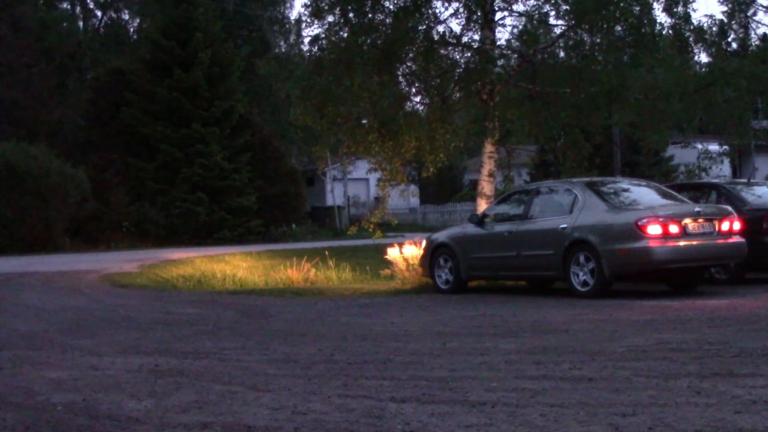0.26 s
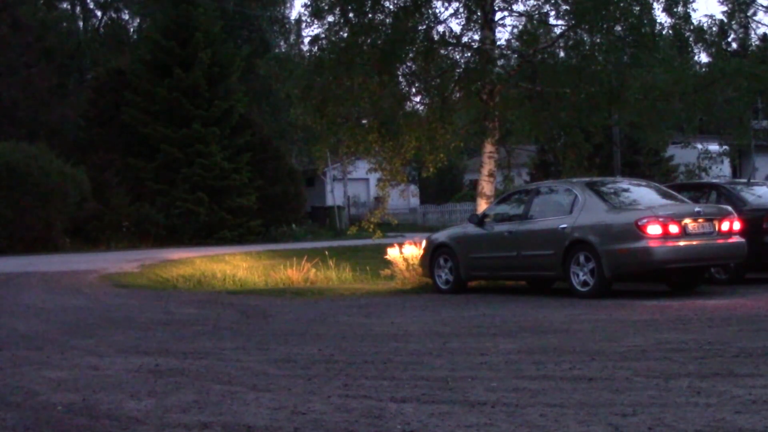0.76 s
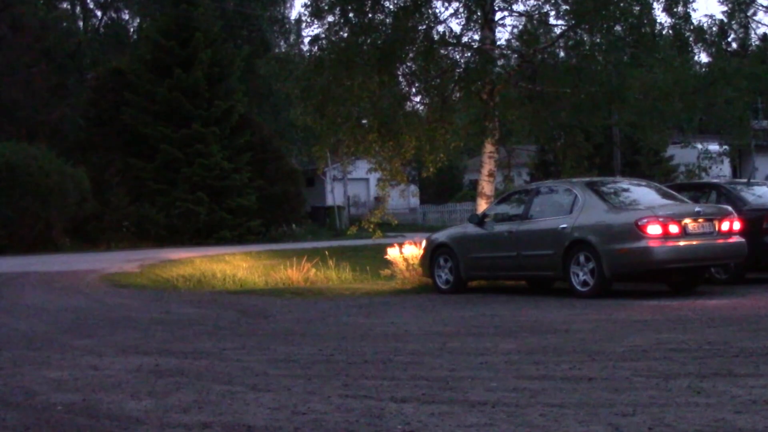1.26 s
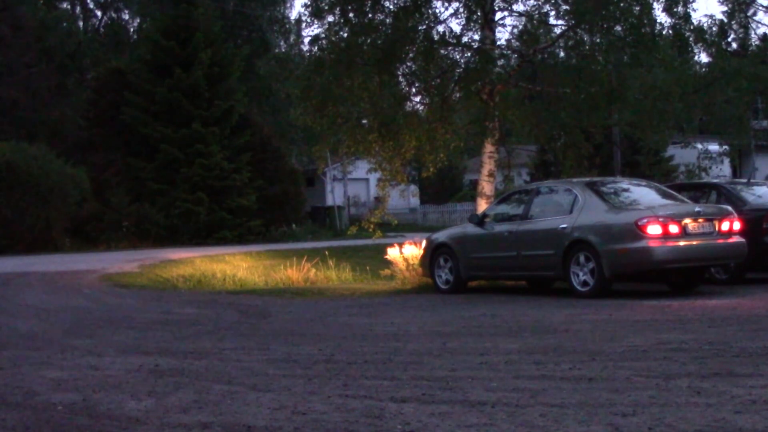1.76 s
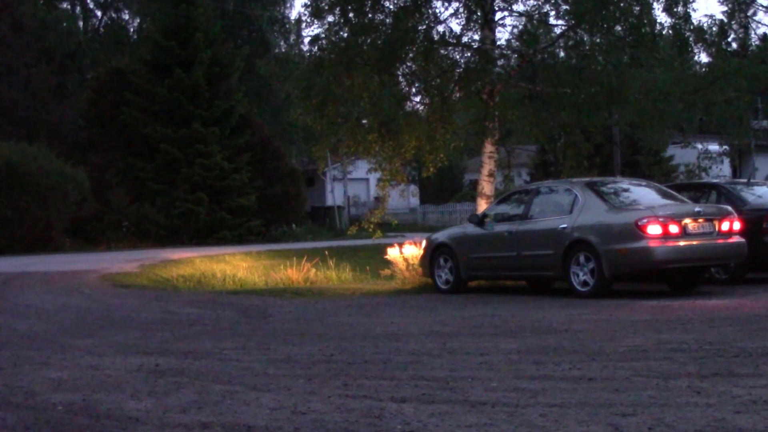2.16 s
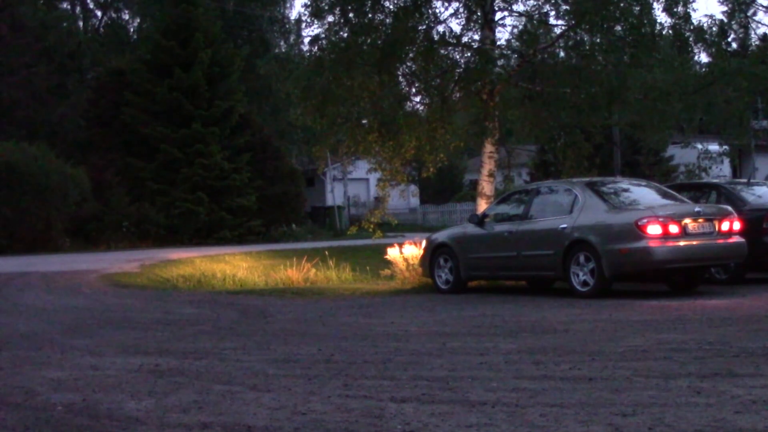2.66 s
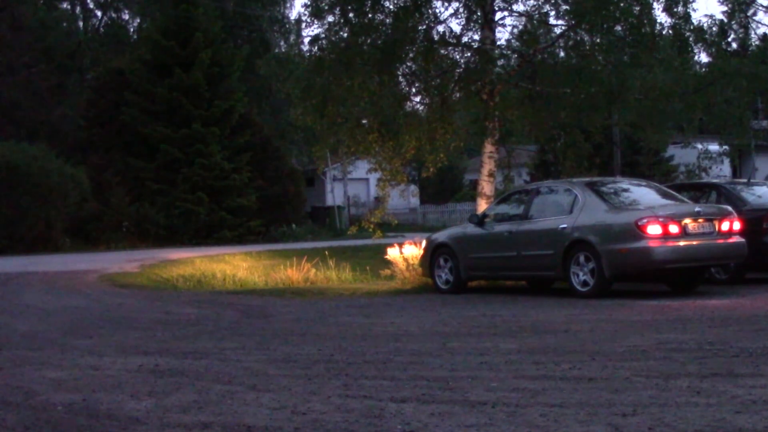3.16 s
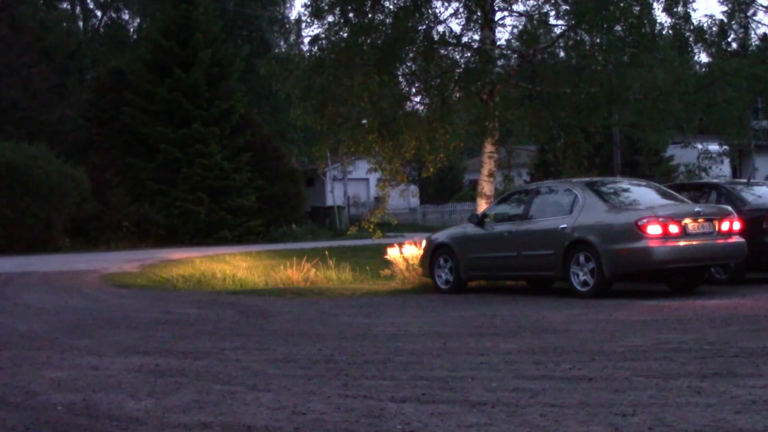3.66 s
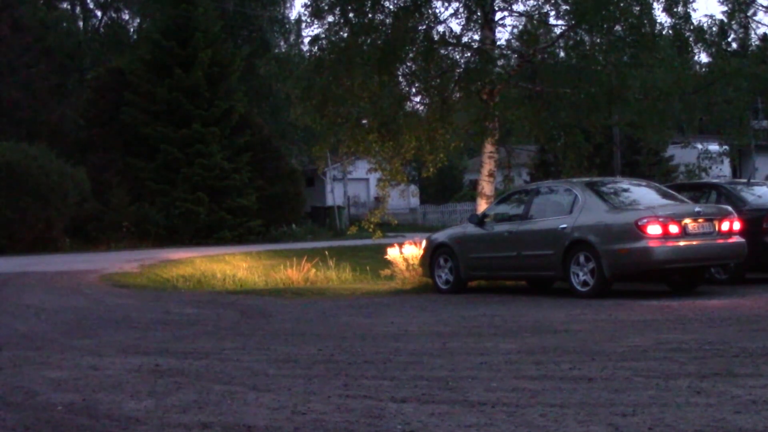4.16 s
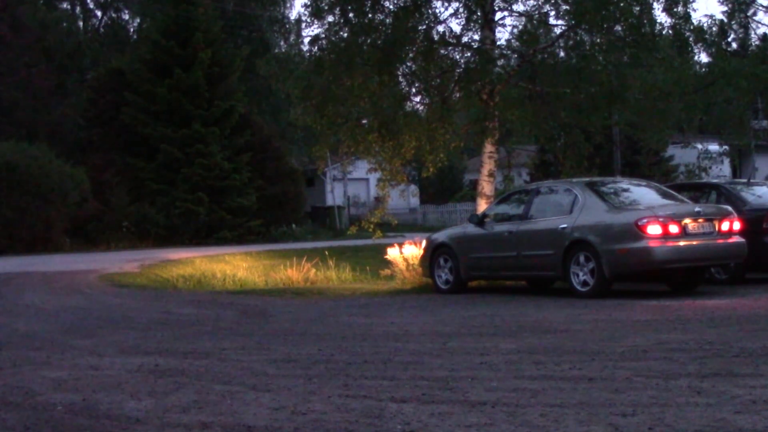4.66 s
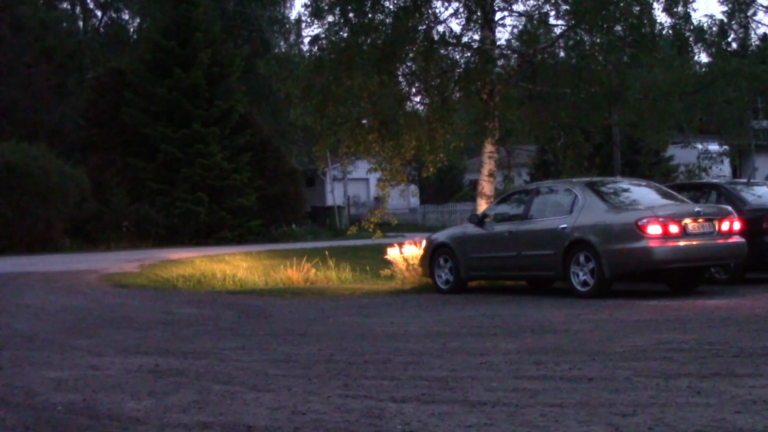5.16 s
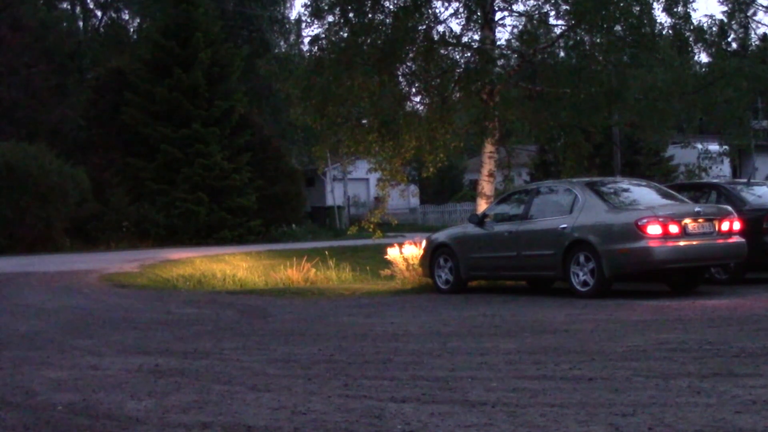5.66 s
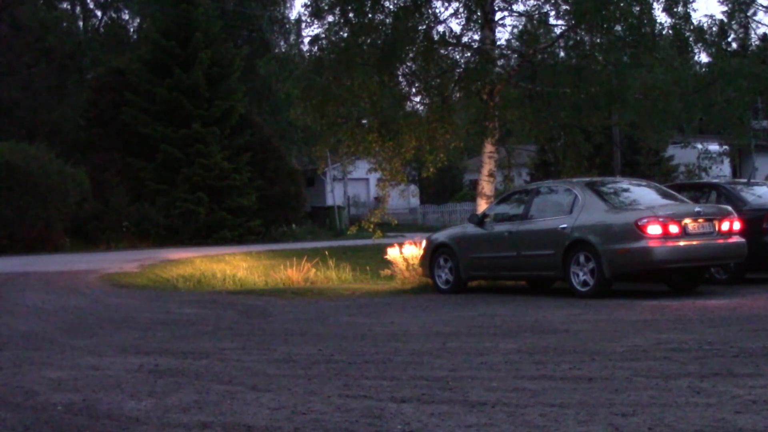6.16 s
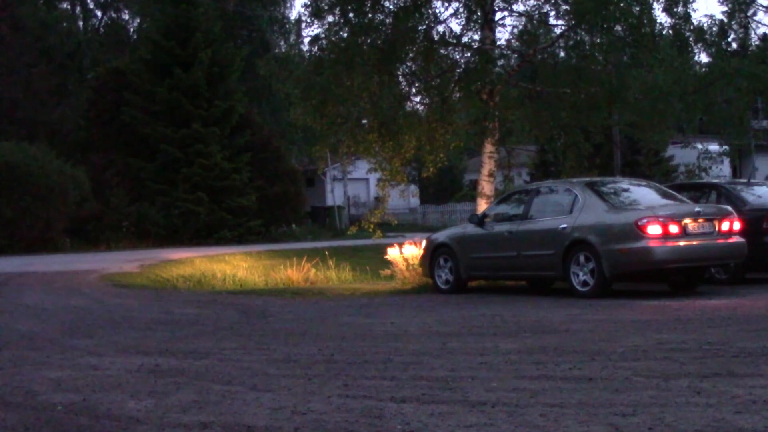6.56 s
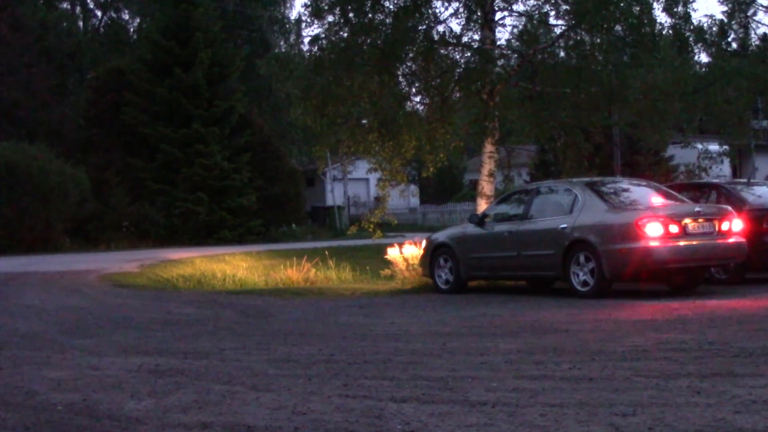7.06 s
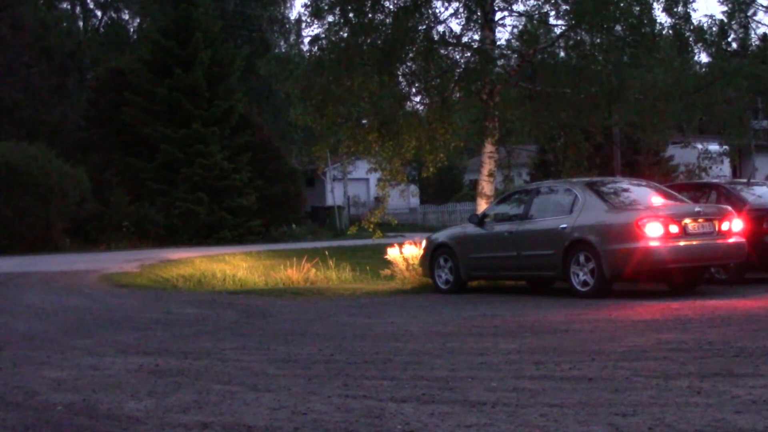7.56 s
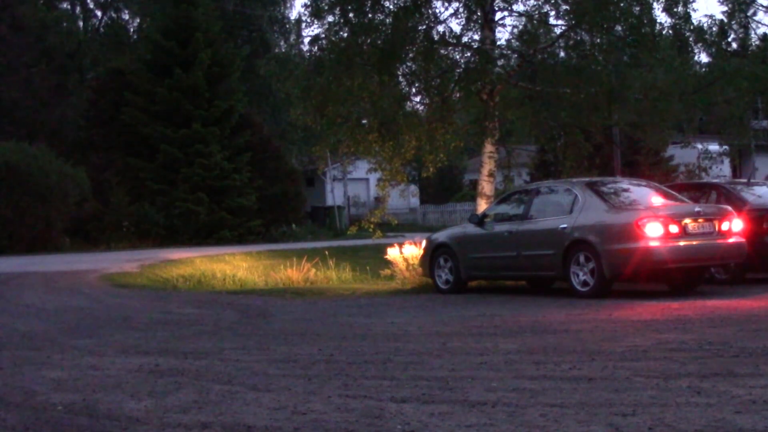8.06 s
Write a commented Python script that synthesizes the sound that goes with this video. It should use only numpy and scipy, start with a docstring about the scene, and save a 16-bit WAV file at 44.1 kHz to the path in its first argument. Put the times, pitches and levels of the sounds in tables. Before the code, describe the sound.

A six-cylinder car idles outdoors for a little over eight seconds, its loud exhaust dominating. The sound is a deep, booming drone with a lumpy flutter, firing near 57 times a second, coloured by hollow pipe resonances, puffing gas and faint valve knock. From 0 to 0.6 s a nearby songbird gives thin falling whistles; from about 0.65 to 1.4 s come six evenly spaced buzzy chirps, then tiny high whistles near 1.6 s and steep rising slurs at 1.8 to 2 s. At about 3.1 s the idle steps up quickly to roughly 62 firings, its resonances blooming differently, then drifts near 63 to the end. Distant birds twitter in irregular bouts, strongest around 3.4 s; a faint chirp and whistle return near 7.5 to 7.7 s. Trees return a short echo. Quiet steady hiss, mono, with no driving away.

```python
"""A loud six-cylinder exhaust idles, its firing rate stepping from about 57 to 62 Hz just after three seconds.
Engine orders slide across narrow pipe resonances and bloom; puffed gas noise and valve knock ring broad ones.
A near songbird, built of gliding, trilled tones, whistles, chirps and slurs as it ends its phrase.
Far birds twitter in random short notes; all birds echo from trees. Shaped noise gives a steady hiss."""
import sys
import numpy as np
from scipy import signal
from scipy.fft import rfft, irfft
from scipy.io import wavfile
from scipy.ndimage import uniform_filter1d

SR = 44100
rng = np.random.default_rng(int(sys.argv[2]) if len(sys.argv) > 2 else 0)


def wav_out(sig):
    """Save sig, one row per channel (or a flat mono array), as 16-bit PCM at SR to the path in sys.argv[1]."""
    wavfile.write(sys.argv[1], SR, np.round(np.clip(np.atleast_2d(sig).T, -1, 1) * 32767).astype(np.int16))


N = 366471


def undb(db):
    """Decibels to amplitude ratio."""
    return 10 ** (np.asarray(db) / 20)


def unit(x):
    """Scale to an RMS of 1."""
    return x / np.sqrt(np.mean(x ** 2))


def at_samples(times_s, values):
    """Straight lines between table points, one value a sample."""
    return np.interp(np.arange(N) / SR, times_s, values)


def walk(rate_hz):
    """Random values, each held 1 / rate_hz seconds, then smoothed twice; spread a little below 1."""
    hold = int(SR / rate_hz)
    steps = np.repeat(rng.standard_normal(N // hold + 1), hold)
    return uniform_filter1d(uniform_filter1d(steps, hold), hold)[:N]


# Spectrum of the hiss. Each row: frequency in Hz, relative level in dB per Hz.
AIR_SPECTRUM = [(290, -31.5), (500, -6.5), (613, -12), (819, -11.5), (988, -19.5), (1090, -16),
                (1190, -23.5), (1790, -27), (2130, -29.5), (3150, -30.5), (8580, -42), (14900, -43),
                (16000, -53.5)]
AIR_RMS_DB = -47.5


def air():
    """Steady hiss of leaves, engine bay and microphone: white noise shaped in the frequency domain."""
    hz, db = np.transpose(AIR_SPECTRUM)
    bins_hz = np.maximum(np.arange(N // 2 + 1) * SR / N, 1)
    shape_db = np.interp(np.log(bins_hz), np.log(hz), db)
    hiss = irfft(rfft(rng.standard_normal(N)) * undb(shape_db), N)
    return unit(hiss) * undb(AIR_RMS_DB)


def note(start_s, length_s, hz0, hz1, db, trill_per_s, depth, bend=1, full_swing_hz=260, rough=1.1):
    """A gliding tone chopped by an uneven trill, each chop sweeping up; returns first sample and sound."""
    count = int(length_s * SR)
    u = np.arange(count) / (length_s * SR)  # 0 to 1 along the note
    depth = np.clip(depth, 0, 1)
    stumble = unit(uniform_filter1d(rng.standard_normal(count), size=300))
    rasp = unit(uniform_filter1d(rng.standard_normal(count), size=70))
    beat = np.pi * trill_per_s * length_s * u + 0.59 * stumble
    glide_hz = hz0 + (hz1 - hz0) * u ** bend
    hz = glide_hz - full_swing_hz * depth ** 2 * np.sin(2 * beat)
    tone = np.sin(2 * np.pi * np.cumsum(hz) / SR)
    tone = tone * (1 + rough * depth ** 2 * rasp)
    swell = np.sin(np.pi * u) ** 0.53
    chop = 1 - depth * np.cos(beat) ** 2
    return int(start_s * SR), 2 * undb(db) * swell * chop * tone


# Base level of the far birds. Each row: time in seconds, level in dB before the offsets below.
CHATTER = [(0, -61.5), (.6, -59.5), (1.45, -56), (1.75, -66), (2.3, -61.5), (3.15, -76), (3.401, -53.5),
           (4.1, -62), (5.0, -61), (6.7, -70.5), (8.3, -63.5)]
CHATTER_BOUT_DB = 4


def far_twitter(low_hz=2350, span_hz=1000, glide_hz=1600, far_db=-6, count=2000):
    """Dense notes of 9 to 24 ms at random times and pitches, in short bouts; rows as note() takes them."""
    times_s, levels_db = np.transpose(CHATTER)
    bouts_db = CHATTER_BOUT_DB * walk(12)
    rows = []
    for place, length, pitch, glide, faintness in rng.random((count, 5)):
        start_s = place * (N / SR - .1)
        middle_hz = low_hz + span_hz * pitch
        sweep_hz = glide_hz * (glide - .5)
        db = np.interp(start_s, times_s, levels_db) + bouts_db[int(start_s * SR)]
        db += far_db - 12 * faintness
        rows.append((start_s, 0.0091 + .015 * length,
                     middle_hz - sweep_hz / 2, middle_hz + sweep_hz / 2, db, 80, .7))
    return rows


# Thin whistles. Each row: start in seconds, length in seconds, first pitch in Hz, level in dB before doubling.
WHISTLES = [(0.05, 0.13, 4350, -68), (0.125, 0.18, 4200, -61.5), (0.387, 0.29, 4245, -62),
            (0.49, 0.042, 4090, -50), (0.67, 0.11, 4080, -67), (1.61, .055, 6200, -65),
            (1.638, .08, 7770, -65), (7.71, .08, 3900, -63)]
WHISTLE_SAG_HZ_PER_S, WHISTLE_TRILL_PER_S, WHISTLE_DEPTH = 800, 16, 0.5  # sag: mean over the note
WHISTLE_BEND = .5  # below 1 the pitch drops early, then levels off


def whistles():
    """Near bird: falling tones, slowly trilled; rows as note() takes them."""
    return [(s, length, hz, hz - WHISTLE_SAG_HZ_PER_S * length, db,
             WHISTLE_TRILL_PER_S, WHISTLE_DEPTH, WHISTLE_BEND)
            for s, length, hz, db in WHISTLES]


# Buzzy chirps. Each row: start in seconds, middle pitch in Hz, level in dB before doubling.
CHIRPS = [(0.644, 3520, -54), (0.78, 3680, -53), (0.925, 3720, -51), (1.065, 3640, -50.5),
          (1.211, 3780, -50), (1.365, 3820, -51.5), (7.46, 4306, -63)]
CHIRP_S, CHIRP_RISE_HZ, CHIRP_TRILL_PER_S, CHIRP_DEPTH = .068, 160, 95, .76


def chirps():
    """Near bird: short tones rising a little under a fast trill; rows as note() takes them."""
    return [(s, CHIRP_S, hz - CHIRP_RISE_HZ / 2, hz + CHIRP_RISE_HZ / 2, db,
             CHIRP_TRILL_PER_S, CHIRP_DEPTH)
            for s, hz, db in CHIRPS]


# Closing slurs. Each row: start in seconds, length in seconds, first pitch in Hz, level in dB before doubling.
SLURS = [(1.823, .125, 3280, -52.5), (1.903, 0.078, 4250, -58)]
SLUR_RISE_HZ_PER_S, SLUR_TRILL_PER_S, SLUR_DEPTH = 5800, 130, .74


def slurs():
    """Near bird: steep upward sweeps under a fast trill; rows as note() takes them."""
    return [(s, length, hz, hz + SLUR_RISE_HZ_PER_S * length, db, SLUR_TRILL_PER_S, SLUR_DEPTH)
            for s, length, hz, db in SLURS]


def sing(rows):
    """Lay the notes on one track."""
    track = np.zeros(N + SR)
    for row in rows:
        first, sound = note(*row)
        track[first:first + len(sound)] += sound
    return track[:N]


def tree_echo(dry, t60_s=.25, level_db=-10):
    """The tree line returns a wash: convolution with decaying noise of unit energy."""
    lag_s = np.arange(SR // 2) / SR
    tail = rng.standard_normal(len(lag_s)) * np.exp(-np.log(1000) * lag_s / t60_s)
    tail /= np.sqrt(np.sum(tail ** 2))
    return undb(level_db) * signal.fftconvolve(dry, tail)[:N]


def birds():
    """Far twitter and near song, direct plus echo."""
    direct = sing(far_twitter() + whistles() + chirps() + slurs())
    return direct + tree_echo(direct)


def ring(x, hz, width_hz):
    """Two-pole resonance, gain 1 at the centre."""
    b, a = signal.iirpeak(hz, hz / max(width_hz, 1), fs=SR)
    return signal.lfilter(b, a, x)


def pulse_train(times_s, sizes):
    """One single-sample pulse at each time."""
    return np.bincount((times_s * SR).astype(int), sizes, N)


# Broad resonances of body and tailpipe. Each row: centre in Hz, width in Hz, mean level in dB.
GAS = [(43.6, 10, -47.5), (76, 56, -39), (134, 220, -54), (253.9, 17, -42), (301.7, 82, -43),
       (366, 55, -52), (436.8, 21, -52), (507, 38, -53), (575.3, 25, -52.5), (701, 29, -52.5),
       (749.7, 23, -53), (813.5, 23, -51), (907, 37, -56.5), (1066, 28, -64.5), (1111, 18, -63),
       (1323, 150, -63), (1817, 100, -69)]
# Gas puff of each cylinder in firing order, in dB.
PUFF_DB = [-2.5, -0.5, -3, -3.5, 4, -3]
GAS_FLICKER_DB = 2.
GAS_BRIGHTER_DB_PER_HZ = 0.42  # per Hz of firing rate and octave above 600 Hz
KNOCK_DB_PER_HZ = -.9  # knock stands out more the slower the engine fires


def gas(cycles, firing_hz, puff_ms=7., puff_share=.6, scatter_db=1.5, knock_db=-3):
    """Rushing gas, puffed once a firing, and the knock of each valve ring broad resonances."""
    firing = np.arange(int(cycles[-1] * len(PUFF_DB)))
    times_s = np.interp(firing / len(PUFF_DB), cycles, np.arange(N) / SR)
    cylinder_db = np.array(PUFF_DB)[firing % len(PUFF_DB)]

    puff_sizes = undb(cylinder_db + scatter_db * rng.standard_normal(len(firing)))
    fade = np.exp(-1000 / (puff_ms * SR))
    two_poles = np.convolve([1, -fade], [1, -fade])  # each puff swells, then decays
    puffs = unit(signal.lfilter([1], two_poles, pulse_train(times_s, puff_sizes)))

    knocks = unit(pulse_train(times_s, undb(2 * cylinder_db)))
    knocks *= undb(knock_db + KNOCK_DB_PER_HZ * (firing_hz - 58))

    out = 0
    for hz, width_hz, db in GAS:
        rush = rng.standard_normal(N) * (1 - puff_share + puff_share * puffs)
        rung = unit(ring(ring(rush + knocks, hz, width_hz), hz, 2 * width_hz))
        octaves_up = max(np.log2(hz / 600), 0)
        moving_db = GAS_FLICKER_DB * walk(6) + GAS_BRIGHTER_DB_PER_HZ * (firing_hz - 60) * octaves_up
        out = out + undb(db + moving_db) * rung
    return out


# Narrow pipe resonances. Each row: centre in Hz, full width at half amplitude in Hz, then peak levels in dB RMS
# of the firing orders, of the bank orders between them, of the orders of one odd cylinder.
PIPE = [(32, 12, -67, -43, -55), (66.9, 11.7, -12, -55, -44), (91, 39, -27, -31.5, -43),
        (123.3, 7.5, -19, -52.5, -56), (158.4, 16.7, -31, -35, -66), (246.9, 9.5, -23.5, -25.5, -38),
        (287.3, 10.3, -35, -36.5, -42), (310.4, 12, -37, -40.5, -50.5), (349.5, 34, -54.5, -48, -62),
        (406.7, 40, -74.5, -47.5, -65), (435.7, 16.4, -48, -62.5, -51), (507, 25, -50, -54.5, -59.5)]


def exhaust(cycles, cycle_hz, odd_at_cycles=.7, bank_lag_rad=0.7, end_order=50, step=256):
    """Sums the orders of the engine cycle from the second up, as loud as the pipe resonances let them through."""
    hz, width_hz, *levels_db = np.transpose(PIPE)
    coarse = np.arange(0, N, step)
    upper = hz > 200
    out = 0
    for order in range(2, end_order):
        # 0: firing order, 1: bank order, 2: odd-cylinder order
        kind = 0 if order % 6 == 0 else 1 if order % 3 == 0 else 2
        detune = 2 * (order * cycle_hz[coarse, None] - hz) / width_hz
        through = undb(levels_db[kind]) / (1 + detune ** 2)
        gain = np.sqrt(2) * np.sqrt(np.sum(through ** 2, axis=1))
        gain *= undb((.4 + .7 * kind) * walk(8)[coarse])  # weak orders hang on small unevenness, waver most
        # each upper mode turns the phase half a cycle
        lag_rad = np.sum(np.pi / 2 + np.arctan(detune[:, upper]), axis=1) + bank_lag_rad * (kind == 1)
        angle = 2 * np.pi * order * (cycles - odd_at_cycles * (kind == 2))
        angle = angle - np.interp(np.arange(N), coarse, lag_rad)
        # minus: a sharp dip in pressure at each firing
        out = out - np.interp(np.arange(N), coarse, gain) * np.cos(angle)
    return out


# Idle speed. Each row: time in seconds, firing rate in Hz.
IDLE = [(0.0, 56.72), (0.5, 57.06), (1.2, 57.32), (1.85, 56.01), (2.25, 56.63), (2.7, 56.73), (3.0, 57.55),
        (3.18, 61.7), (3.3, 62.44), (3.55, 61.74), (4.0, 61.54), (4.27, 62.75), (4.75, 63.28),
        (5.05, 63.95), (6.25, 63.77), (7.001, 63.55), (7.7, 62.26), (8.31, 63.16)]


def engine(lumpy_db=0.85):
    """Six firings make one engine cycle; the burn wavers quickly in strength, heard on the exhaust orders."""
    firing_hz = at_samples(*np.transpose(IDLE))
    cycle_hz = firing_hz / len(PUFF_DB)
    cycles = np.cumsum(cycle_hz) / SR
    burn = undb(lumpy_db * walk(14))
    return burn * exhaust(cycles, cycle_hz) + gas(cycles, firing_hz)


def scene():
    """Hiss, birds and engine summed to one channel."""
    return (air() + birds() + engine())[None]


def record(dry, bass_hz=30, top_hz=15750):
    """The microphone drops the deepest bass and the recorder cuts the top steeply."""
    bass_cut = signal.butter(2, bass_hz, "high", fs=SR, output="sos")
    top_cut = signal.ellip(10, .2, 60, top_hz, fs=SR, output="sos")
    return signal.sosfilt(top_cut, signal.sosfilt(bass_cut, dry))


dry = scene()
out = record(dry)
wav_out(out)
```